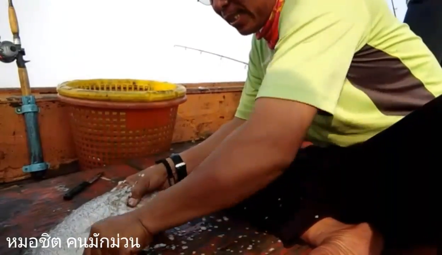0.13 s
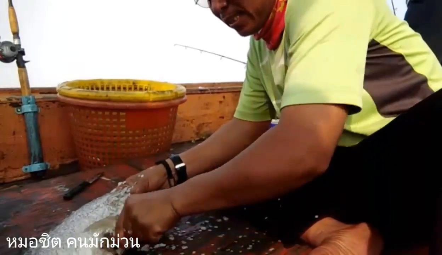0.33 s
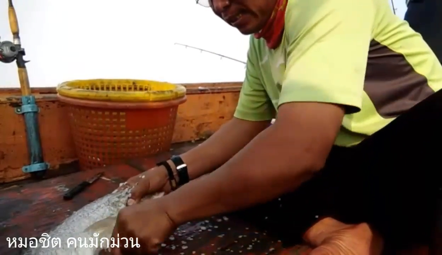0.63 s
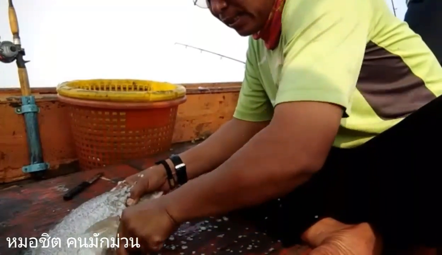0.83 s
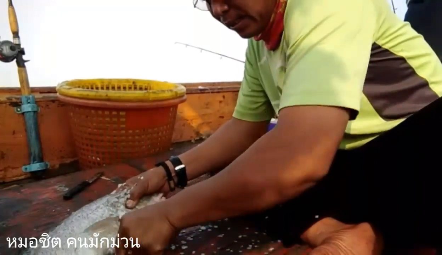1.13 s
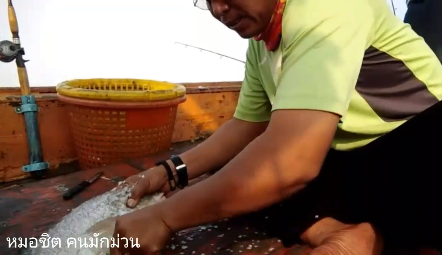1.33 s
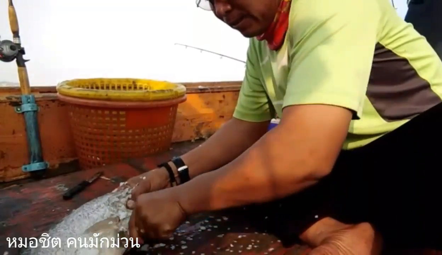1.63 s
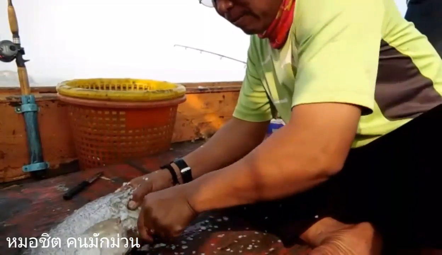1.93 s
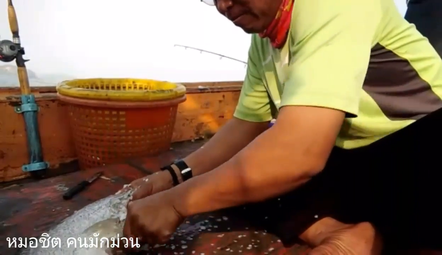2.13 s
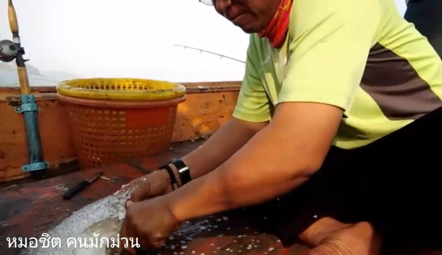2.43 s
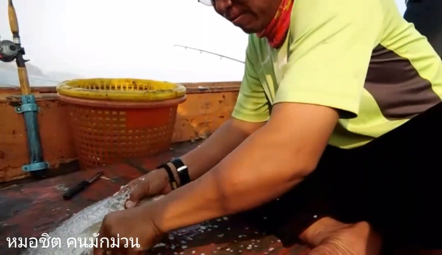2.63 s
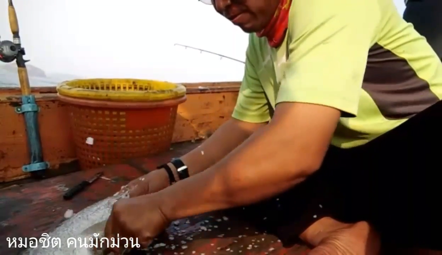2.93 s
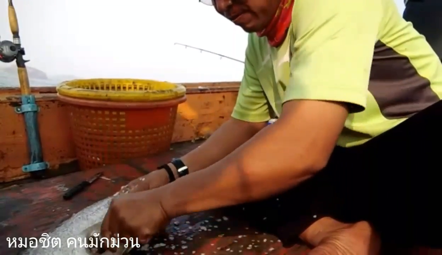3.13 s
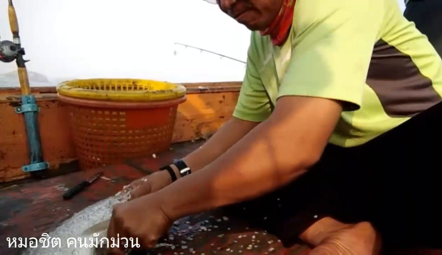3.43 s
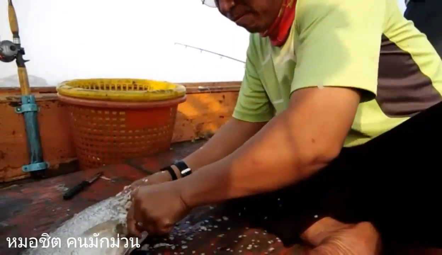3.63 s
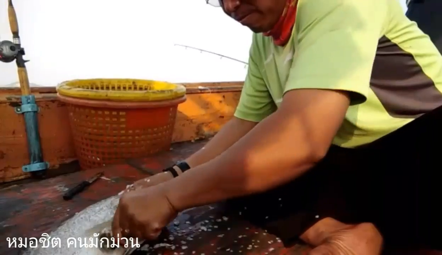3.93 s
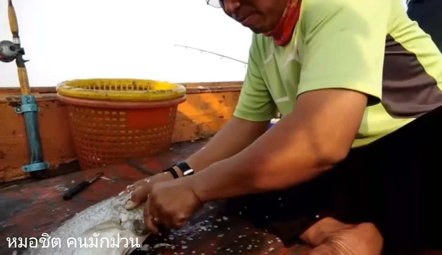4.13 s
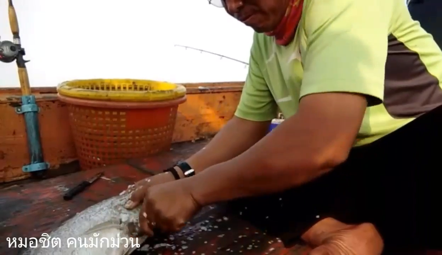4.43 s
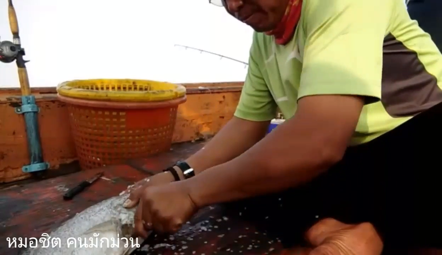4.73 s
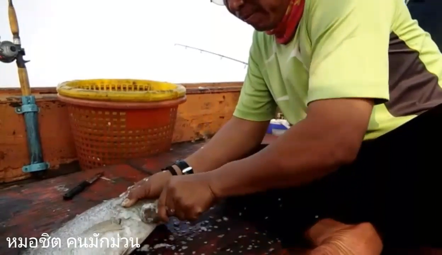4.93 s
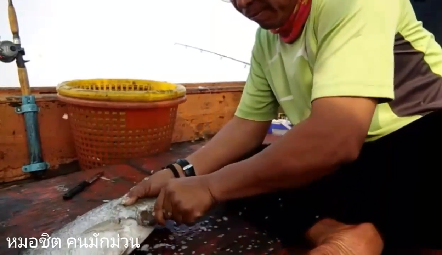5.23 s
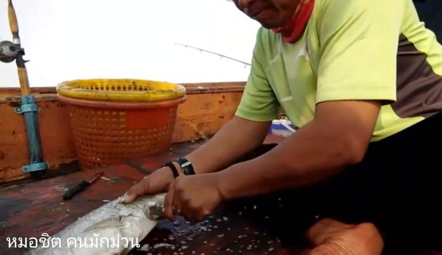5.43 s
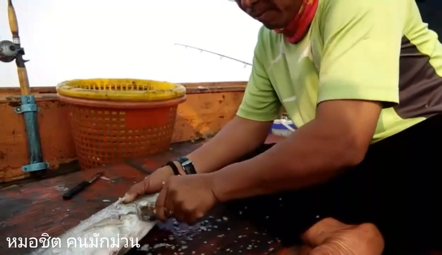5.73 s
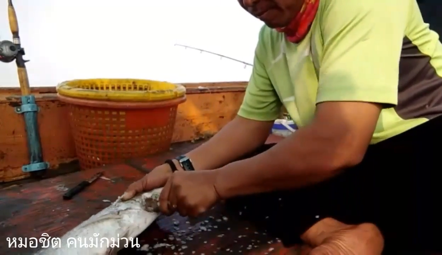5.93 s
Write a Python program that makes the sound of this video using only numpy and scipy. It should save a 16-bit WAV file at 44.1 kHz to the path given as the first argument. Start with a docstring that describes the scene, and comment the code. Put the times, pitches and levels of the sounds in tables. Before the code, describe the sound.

Rapid fish scaling on a boat deck, recorded very close and outdoors. Strong forward rasps alternate with faint return strokes, starting well spaced and becoming busier from about three seconds. Crackling scale ticks, brief wet squeaks and soft low body thumps accompany them; the heaviest thumps come just after four seconds, then the scraping thins and eases. The centre is dry, with the gritty treble slightly wide.

```python
"""A hand scaler is dragged in quick strokes along a fish on a wooden boat deck, heard from close by.
Teeth rasp over the skin: gritty noise follows the pressure, through bright teeth and dull flesh colours.
Scales snap loose as ticks with a short noise spray, and wet skin squeaks in narrow bands of noise.
The fish shudders as lumpy noise in the plank modes and thumps as dying sines, over quiet open air."""
import sys
import numpy as np
from scipy import signal
from scipy.io import wavfile
from scipy.ndimage import uniform_filter1d

SR = 44100
rng = np.random.default_rng(int(sys.argv[2]) if len(sys.argv) > 2 else 0)


def volts_from_db(level):
    """Convert decibel levels to linear amplitude ratios."""
    exponent = np.asarray(level, float) / 20
    return 10 ** exponent


def wav_out(sig):
    """Save sig, one row per channel (or a flat mono array), as 16-bit PCM at SR to the path in sys.argv[1]."""
    wavfile.write(sys.argv[1], SR, np.round(np.clip(np.atleast_2d(sig).T, -1, 1) * 32767).astype(np.int16))


N = 268789

# Strokes of the scaler, forward and lightly back. Each row: teeth bite in seconds, build-up in seconds,
# let-go in seconds, pressure at the bite in dB, top pressure in dB.
STROKES = [(0, 0.071, 0.11, -65.5, -66), (.09, 0.042, .05, -78, -79), (.152, 0.086, 0.061, -63.5, -43),
           (.31, 0.043, 0.065, -63, -51.5), (0.476, .095, 0.037, -58, -45), (.63, 0.059, 0.045, -67.5, -63),
           (0.771, 0.089, 0.038, -59.5, -40), (1.095, 0.075, 0.033, -53, -50.5),
           (1.21, 0.033, 0.05, -67.5, -58.5), (1.358, 0.044, 0.06, -57.5, -45.5),
           (1.611, 0.043, .12, -65, -50.5), (1.855, 0.096, 0.043, -60, -46),
           (2.143, 0.034, 0.12, -63.5, -45), (2.425, 0.047, 0.083, -54, -45.5),
           (2.55, 0.019, 0.068, -71, -69.5), (2.714, .043, 0.047, -56, -43.5),
           (3.007, 0.024, 0.047, -53, -42), (3.082, 0.082, 0.036, -65.5, -54),
           (3.256, 0.061, .042, -57, -52.5), (3.37, .012, 0.16, -72, -71.5),
           (3.52, 0.032, 0.12, -57, -44.5), (3.665, 0.0093, 0.067, -82, -66),
           (3.724, 0.0414, .04, -75, -64.5), (3.774, 0.032, 0.22, -60.5, -49.5),
           (3.92, 0.022, 0.019, -84, -71), (4.062, 0.046, 0.031, -54.5, -43.5),
           (4.18, .024, .036, -76, -66.5), (4.23, .06, .05, -82, -77), (4.305, 0.055, 0.037, -58, -43),
           (4.4, 0.011, .08, -60, -62.5), (4.53, 0.043, 0.048, -82, -74.5),
           (4.586, 0.036, 0.14, -59.5, -53), (4.655, 0.042, .03, -62.5, -61.5),
           (4.719, 0.14, 0.044, -75, -69.5), (4.852, 0.087, .06, -58.5, -54.5),
           (4.99, 0.021, 0.034, -72, -73), (5.147, 0.073, .04, -56.5, -58),
           (5.265, 0.031, 0.068, -71.5, -83), (5.396, 0.055, 0.062, -62, -50),
           (5.662, 0.051, 0.038, -60.5, -51.5), (5.918, 0.025, 0.03, -61, -48)]
# How soft the part under the teeth is. Each row: time in seconds, flesh against teeth in dB.
SOFTNESS = [(0, -2.5), (.22, 0.5), (.35, -11), (.55, -1), (.68, 2.5), (.85, -3.5), (1.15, -4.5),
            (1.25, -10.5), (1.4, -5.5), (1.7, -2), (2.2, -0.5), (2.45, -2), (2.75, -0.5), (3.02, 0),
            (3.15, -6), (3.3, 1), (3.38, 13.5), (3.55, -9), (3.63, 4), (3.82, -3.5), (4.1, -2.5),
            (4.33, -4), (4.6, -2), (4.9, 0.5), (5.2, 2), (5.45, 3.5), (5.7, 4.5), (6.09, -1.5)]
# Colour of the teeth. Each row: frequency in Hz, relative density in dB per Hz.
TEETH_COLOUR = [(1060, -28.5), (1800, -10.5), (2360, -6.5), (3160, -4.5), (4040, -6), (4870, -5),
                (7270, -7.5), (9870, 1), (12600, -14), (13300, -20), (13800, -44)]
# Colour of the flesh. Each row: frequency in Hz, relative density in dB per Hz.
FLESH_COLOUR = [(180, -20.5), (300, -1), (549, -5), (606, -5.5), (676, -7.5), (1060, -7.5), (1700, -11.5),
                (1870, -12), (2350, -13.5), (3200, -18), (4160, -43.5), (7040, -120)]
# Where the flesh rings when a tooth catches. Each entry: frequency in Hz.
BELLY_HZ = [372.5, 604, 850, 1055, 1340, 1933]
# Scales snapping loose. Each row: time in seconds, spray in dB, tick above the spray in dB,
# tilt toward the top in dB, fleshy part in dB.
SNAPS = [(.2058, -39.5, 12.5, -5, -60), (0.2618, -36.5, 21, 0.5, -56), (.3382, -50.5, 18.5, 29, -58),
         (0.4876, -50.5, 15, 9, -50.5), (.5195, -46.5, 21, 14, -64), (0.5447, -39, 18, 13, -47),
         (0.55, -37.5, 19, 10, -48), (0.5624, -35.5, 14.5, -11, -47.5), (.8393, -41, 23.5, 9, -58.5),
         (.8595, -36, 15, -10.5, -47.5), (1.0922, -48.5, 4, 22, -69), (1.1592, -49.5, 15, 20, -59),
         (1.3837, -41, 21, 7, -69), (1.4354, -42, 16.5, -5, -57.5), (1.6465, -37.5, 15, 3, -42.5),
         (1.6758, -36, 7, 0.5, -57), (1.703, -52.5, 10, -14, -67), (1.7103, -50.5, 9, -11.5, -60.5),
         (1.883, -53, 14, -8, -46.5), (1.919, -29, 8, 16, -38.5), (1.9518, -42, 15, 9, -48),
         (2.1426, -61.5, 18, -11, -57.5), (2.1609, -51.5, 21, -10, -54.5), (2.1734, -38, 14, 7, -43.5),
         (2.2002, -38.5, 18, 23, -48), (2.2539, -48, 18.5, 6, -57), (2.4279, -51, 22, -7, -54),
         (2.452, -42.5, 19, -1, -48), (2.4753, -29.5, 21.5, 0, -46.5), (2.714, -50, 12, 12, -65),
         (3.0083, -47.5, 15, 7, -62), (3.026, -40, 5.5, 21, -48), (3.083, -47, 11, -5, -49.5),
         (3.158, -36, 4.5, 22, -70), (3.277, -39.5, 8, 15, -45), (3.3097, -34, 15.5, 12, -37),
         (3.5167, -54, 12, 14, -54.5), (3.5547, -36.5, 17.5, -2, -45), (3.6734, -43.5, 11.5, 22.5, -62),
         (3.7867, -43.5, -3, -4, -48), (4.0614, -58, 15, -5.5, -56), (4.0889, -36, 15, 6, -58),
         (4.3167, -51, 16.5, 16, -40.5), (4.4065, -52, 14, -4.5, -45.5), (4.626, -41.5, 5, 16, -53),
         (4.6563, -54, 18, 17, -59), (4.699, -53.5, 12, 10, -64), (5.215, -47.5, 0, 0, -42.5),
         (5.3965, -73, 19, -8, -58.5), (5.452, -50, 17, -5.5, -38.5), (5.478, -51.5, 12, 4, -54),
         (5.6911, -41, 8.5, -9.5, -35), (5.9359, -48, 13, -16, -39), (5.961, -57.5, 10, -5, -49)]
# Brief wet squeaks and blips of the skin. Each row: start in seconds, middle pitch in Hz,
# length in seconds, level before the fades in dB.
SQUEAKS = [(0.004, 3070, 0.027, -65), (0.04, 5000, 0.074, -73), (1.257, 3170, 0.031, -69.5),
           (0.638, 3360, 0.044, -58), (2.504, 752, 0.025, -50.5), (2.801, 950, 0.022, -60),
           (3.09, 1320, 0.014, -53.5), (3.362, 1340, 0.013, -51.5), (3.421, 950, .01, -59),
           (3.362, 1930, 0.011, -54), (3.45, 960, 0.021, -68), (4.244, 1310, 0.029, -64.5)]
# The fish dragged and rocked on the planks. Each row: start in seconds, length in seconds,
# level of the push in dB, pitch of the pressed spot in Hz.
DRAGS = [(0, 0.16, -48, 103), (0.15, .06, -41, 104), (0.233, .02, -33, 123), (0.266, 0.12, -43, 104),
         (0.397, 0.081, -50.5, 90), (.5, 0.075, -42.5, 152), (0.64, 0.022, -44, 104),
         (0.781, .085, -47.5, 168), (1.101, 0.086, -48, 115), (1.187, 0.063, -58, 117),
         (1.364, 0.064, -49, 130), (1.42, 0.036, -54.5, 120), (1.645, 0.071, -42.5, 143),
         (1.866, 0.1, -45.5, 141), (2.16, 0.056, -46, 180), (2.207, 0.053, -42.5, 102),
         (2.44, 0.093, -45, 157), (2.563, 0.021, -39.5, 219), (2.729, 0.046, -43.5, 168),
         (2.83, 0.051, -64.5, 110), (3.007, 0.093, -45, 131), (3.114, 0.014, -37.5, 135),
         (3.151, .08, -50.5, 102), (3.264, 0.076, -43, 143), (3.35, 0.03, -41, 131),
         (3.511, .15, -47.5, 113), (3.683, 0.049, -45.5, 293), (3.785, .07, -43, 91),
         (3.88, 0.072, -51.5, 82), (4.068, 0.068, -43, 139), (4.144, 0.19, -47, 100),
         (4.302, 0.041, -42, 85), (4.412, 0.019, -40.5, 146), (4.537, 0.12, -49, 99.5),
         (4.672, 0.095, -48, 110), (4.792, 0.14, -44.5, 102), (4.953, .03, -46, 116),
         (5.156, 0.075, -51.5, 101), (5.392, 0.033, -49.5, 232), (5.429, 0.056, -44, 245),
         (5.668, 0.05, -49.5, 140), (5.93, 0.013, -48, 394)]
# Plank modes. Each row: frequency in Hz, width in Hz, relative level in dB.
DECK_MODES = [(69.1, 26, 0), (95.4, 28.2, 3), (135, 31.4, -3), (200, 21.9, -4.5), (248, 72, -13.5),
              (348, 51, -24.5)]
# Fish thumping on the planks. Each row: start in seconds, level before the soft onset in dB,
# settled pitch of the ring in Hz, time to fall 60 dB in seconds.
THUMPS = [(0.043, -42, 150, 0.12), (0.225, -28, 112, 0.13), (0.332, -32, 104, 0.1), (0.535, -39, 112, 0.17),
          (0.639, -24, 114, 0.035), (1.133, -36.5, 114, 0.14), (1.38, -40, 135, 0.19),
          (1.648, -33.5, 145, 0.23), (1.905, -42.5, 194, 0.1), (2.5608, -23.5, 181, 0.039),
          (2.756, -33, 145, 0.13), (3.016, -40, 123, 0.2), (3.118, -26.5, 88, 0.073),
          (3.324, -27.5, 129, 0.074), (3.566, -28.5, 135, 0.083), (3.674, -37, 271, 0.13),
          (3.705, -28, 318, 0.058), (3.726, -37, 317, 0.056), (3.786, -35, 88, 0.1),
          (4.116, -31.5, 103, 0.062), (4.191, -20, 110, 0.047), (4.242, -17, 88, 0.039),
          (4.412, -33, 137, 0.093), (4.588, -34, 110, 0.13), (4.971, -37, 116.6, 0.15),
          (5.421, -29.5, 252, 0.13), (5.455, -33.5, 244.8, 0.14), (5.676, -36, 139, 0.089)]
# Colour of the quiet open air. Each row: frequency in Hz, relative density in dB per Hz.
AIR_COLOUR = [(24, -31), (40, 6.5), (123, 20.5), (715, -15.5), (891, -19), (1680, -42), (6140, -30),
              (10000, -38), (12800, -45.5), (13800, -54.5)]

DECK_REST_DB, DECK_REST_HZ = -81.5, 110  # push and pitch while the fish lies still


def rasp():
    """The same catches shake the teeth (bright) and the flesh (dull); each also rings in bands of its own."""
    shared = grit(per_s=200, spread_db=3.0, t60=0.088, smooth=0.38)
    press = pressure()
    teeth = per_sample(press, rest_db=-93) * shared * rng.standard_normal(N)
    flesh = flesh_gain(press) * shared * rng.standard_normal(N)
    rings, zings = np.zeros((2, N))
    for hz in BELLY_HZ:
        catches = grit(per_s=36, spread_db=5.0, t60=0.043, smooth=0.016)
        rings += mode(flesh * catches, hz, 0.1 * hz)
    for hz in np.geomspace(2800, 11000, num=5):
        catches = grit(per_s=36, spread_db=7.0, t60=0.011, smooth=0.004)
        zings += mode(teeth * catches, hz, 0.18 * hz)
    bright = coloured(volts_from_db(-0.5) * teeth + volts_from_db(-6.0) * zings, TEETH_COLOUR)
    dull = coloured(volts_from_db(-4.0) * flesh + volts_from_db(-0.5) * rings, FLESH_COLOUR)
    return bright + dull


def pressure():
    """Each stroke creeps in, bites fast, builds to its top, lets go and slides away."""
    creep_db_per_s, bite_s, bite_rise_db = 331.5, 0.009, 24
    let_go_db, slide_db_per_s = 27, 214
    bite, build, let_go, bite_db, top_db = np.transpose(STROKES)
    top = bite + build
    end = top + let_go
    light_db = bite_db - bite_rise_db
    end_db = top_db - let_go_db
    times = [bite - bite_s - 1, bite - bite_s, bite, top, end, end + 1]
    levels = [light_db - creep_db_per_s, light_db, bite_db, top_db, end_db, end_db - slide_db_per_s]
    return powers(np.transpose(levels), np.transpose(times)).sum(0)


def flesh_gain(press):
    """The flesh follows the pressure, the softness of the spot and the rub of each drag."""
    soft_db = np.interp(np.arange(len(press)) / 1000, *np.transpose(SOFTNESS))
    full = volts_from_db(2 * -48)  # full pressure; below it the flesh falls less steeply than the teeth
    followed = full * (press / full) ** 0.86 * volts_from_db(2 * soft_db)
    rub = volts_from_db(2 * -21) * drags()[0]
    return per_sample(followed + rub, rest_db=-92)


def snaps():
    """Each scale gives a sharp tick in a spray of noise that dies fast; the belly knocks along."""
    low, top, dull = np.zeros((3, N + 4000))
    t = np.arange(-100, 3900) / SR
    noise = rng.standard_normal((len(SNAPS), 2, len(t)))
    for (s, db, tick_db, tilt_db, flesh_db), (scale_noise, flesh_noise) in zip(SNAPS, noise):
        t60 = np.clip(0.029 * np.exp(-0.1 * tilt_db), .004, .06)  # brighter snaps die sooner
        spray = volts_from_db(-60 * np.maximum(t, -14 * t) / t60)  # steep rise, slower fall
        spray = spray + volts_from_db(-17.5 - 60 * t / 0.077) * (t > 0)  # loose scales scatter
        tick = volts_from_db(tick_db) * (t == 0)
        start = round((s + t[0]) * SR)
        at = slice(start, start + len(t))
        low[at] += volts_from_db(db - tilt_db / 2) * spray * (scale_noise - tick)
        top[at] += volts_from_db(db + tilt_db / 2) * spray * (scale_noise - tick)
        dull[at] += volts_from_db(flesh_db) * spray * (flesh_noise - tick)
    # the low part passes below 6 kHz, the top part above
    split = signal.butter(N=2, Wn=6000, fs=SR)
    bright = top + signal.filtfilt(*split, low - top)
    knock = sum(mode(dull, hz, 0.1 * hz) for hz in BELLY_HZ)
    return coloured(bright[:N], TEETH_COLOUR) + coloured(dull[:N] + volts_from_db(-4) * knock[:N], FLESH_COLOUR)


def squeaks():
    """Wet skin slipping for a moment: noise in one narrow resonance that sags in pitch."""
    out = np.zeros(N + SR)
    for s, hz, length, db in SQUEAKS:
        noise = rng.standard_normal(round(min(length, .09) * SR))
        sag = hz * np.linspace(1.02, .98, len(noise))
        tone = resonate(resonate(noise, sag, 0.087 * hz), sag, .12 * hz)
        fades = signal.windows.tukey(len(noise), .6)
        out[round(s * SR):][:len(noise)] += volts_from_db(db) * evened(tone) * fades
    return out[:N]


def shudder():
    """Lumpy drag of the fish keeps the planks going; where it presses decides which modes lead."""
    lumps = grit(per_s=60, spread_db=-1.9, t60=0.038, smooth=0.52) * rng.standard_normal(N)
    power, hz = drags()
    push = per_sample(power, DECK_REST_DB) * lumps
    pressed = resonate(resonate(push, hz, 53.4), hz, 98)
    deck = planks(planks(push * (DECK_REST_HZ / hz) ** 0.3))
    return volts_from_db(19.5) * pressed + volts_from_db(12.5) * deck


def drags():
    """Power of the drags on the planks, and their pitch averaged by power, so the strongest leads."""
    s, length, db, hz = np.transpose(DRAGS)
    in_db_per_s, out_db_per_s = 799, 422.5
    times = [s - 1, s, s + length, s + length + 1]
    levels = [db - in_db_per_s, db, db, db - out_db_per_s]
    power = powers(np.transpose(levels), np.transpose(times))
    rest = volts_from_db(2 * DECK_REST_DB)
    pitch = (hz @ power + DECK_REST_HZ * rest) / (power.sum(0) + rest)
    return power.sum(0), np.interp(np.arange(N) * 1000 / SR, np.arange(len(pitch)), pitch)


def planks(push):
    """The deck rings in a few fixed modes when pushed."""
    return sum(volts_from_db(db) * mode(push, hz, width) for hz, width, db in DECK_MODES)


def thumps():
    """A soft blow rings the spot that it lands on; the pitch sags as the flesh settles."""
    blows, t = np.zeros(N + SR), np.arange(SR // 2) / SR
    for s, db, hz, t60 in THUMPS:
        turns = hz * t + 0.1 * (1 - np.exp(-.8 * hz * t))
        ring = np.sin(2 * np.pi * turns) * volts_from_db(db - 60 * t / np.clip(t60, .02, .4))
        blows[round(s * SR):][:len(t)] -= ring * (1 - np.exp(-2.5 * t * hz))  # flesh lands softly
    return blows[:N]


def open_air():
    """Quiet open air: steady coloured noise."""
    return volts_from_db(-76.5) * coloured(rng.standard_normal(N), AIR_COLOUR)


def grit(per_s, spread_db, t60, smooth):
    """Random catches of uneven size, each a burst envelope that dies fast, over a smooth rub."""
    sizes = volts_from_db(spread_db * np.minimum(rng.exponential(1, N), 4))
    sizes = sizes * (rng.random(N) < per_s / SR)
    power = signal.lfilter([1], [1, -volts_from_db(-120 / (t60 * SR))], sizes ** 2)
    power = smooth + power / power.mean()
    return np.sqrt(power / power.mean())


def powers(rows_db, times_s):
    """Power of each event over time (one value a millisecond), straight in dB between its corners."""
    t = np.arange(N * 1000 // SR + 2) / 1000
    return np.array([volts_from_db(2 * np.interp(t, s, db)) for s, db in zip(times_s, rows_db)])


def per_sample(power, rest_db):
    """Summed power over a resting level, as a gain for every sample."""
    gain = np.sqrt(power + volts_from_db(2 * rest_db))
    return np.interp(np.arange(N) * 1000 / SR, np.arange(len(power)), gain)


def mode(x, hz, width):
    """A fixed resonance of gain 1 at its centre."""
    r = np.exp(-np.pi * width / SR)
    return 2 * signal.lfilter([1 - r], [1, -r * np.exp(2j * np.pi * hz / SR)], x).real


def resonate(x, hz, width):
    """Shifts the curve hz down to zero, smooths, and shifts back: a moving resonance of gain 1."""
    turn = np.exp(2j * np.pi * np.cumsum(hz * np.ones(len(x))) / SR)
    r = np.exp(-np.pi * width / SR)
    return 2 * (turn * signal.lfilter([1 - r], [1, -r], x / turn)).real


def coloured(x, points):
    """Causal (minimum-phase) filter of energy 1 whose gain follows a colour table."""
    f, db = np.transpose(points)
    hz = abs(np.fft.fftfreq(4096, 1 / SR))
    log_gain = np.log(volts_from_db(np.interp(np.log(hz + 1), np.log(f + 1), db)) + 1e-5)
    taps = np.fft.ifft(np.exp(np.conj(signal.hilbert(log_gain)))).real[:2048]
    return signal.oaconvolve(x, taps / np.linalg.norm(taps))[:N]


def evened(x):
    """Scales to rms 1."""
    return x / np.sqrt(np.mean(x ** 2) + 1e-20)


def scene():
    """Everything lies straight ahead, so both sides start alike."""
    mix = rasp() + snaps() + squeaks() + shudder() + thumps() + open_air()
    return np.tile(mix, (2, 1))


def low_pass(x):
    """Removes everything above the highest recorded frequency."""
    return signal.sosfilt(signal.butter(12, 13910, fs=SR, output="sos"), x)


def record(dry):
    """Band limit; the treble spreads between the sides in patches and closes to the centre around attacks."""
    edge_hz, spread_hz = 13560, 4100  # top of the microphone band; the sides differ above spread_hz
    mid = signal.sosfiltfilt(signal.butter(N=10, Wn=edge_hz, fs=SR, output="sos"), dry[0])
    hz, _, z = signal.stft(mid, SR, nperseg=256)
    treble = uniform_filter1d((abs(z[hz > spread_hz]) ** 2).sum(0), size=4)
    treble_db = 10 * np.log10(treble + 1e-14)
    rising = (np.roll(treble_db, -4) - treble_db > 6.5) * 1.  # looks four frames ahead
    wide = uniform_filter1d(rising, size=12) < .2
    # four patches in five are open, each 12 bins by 16 frames
    patches = rng.random((len(hz) // 12 + 1, z.shape[1] // 16 + 1)) < .8
    wide = wide * np.kron(patches, np.ones((12, 16)))[:len(hz), :z.shape[1]]
    # random phases make the side signal unlike the middle
    scrambled = wide * z * np.exp(2j * np.pi * rng.random(z.shape))
    side = signal.istft(scrambled, nperseg=256)[1][:N]
    high = signal.butter(N=12, Wn=spread_hz, btype="high", fs=SR, output="sos")
    side = signal.sosfiltfilt(high, side)
    return low_pass(np.array([mid + side, mid - side]))


dry = scene()
out = record(dry)
wav_out(out)
```